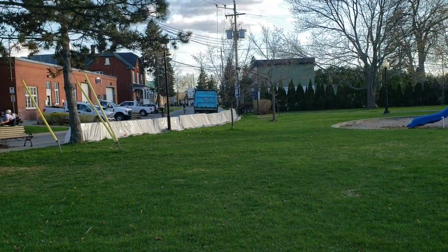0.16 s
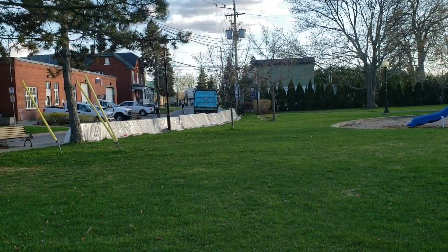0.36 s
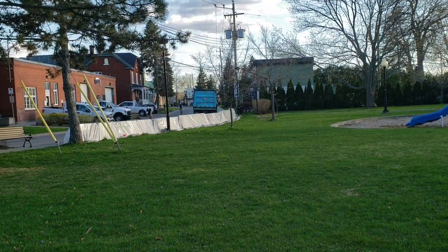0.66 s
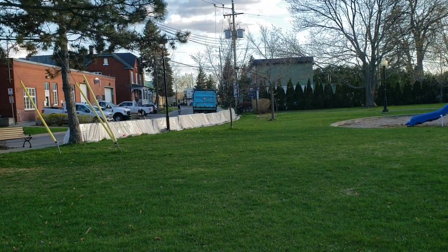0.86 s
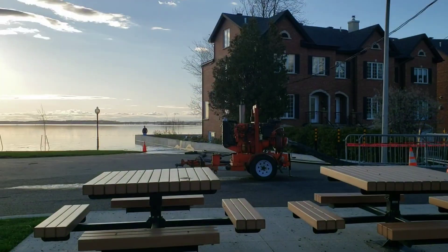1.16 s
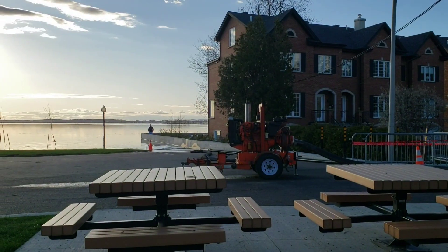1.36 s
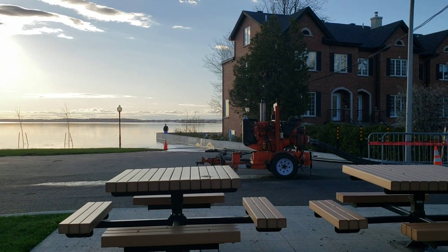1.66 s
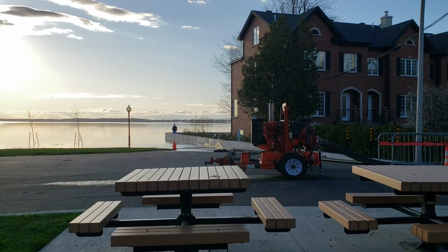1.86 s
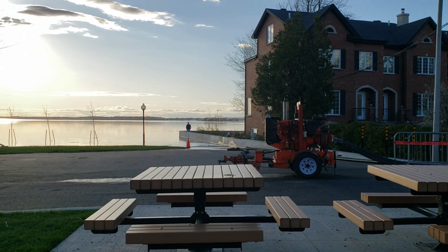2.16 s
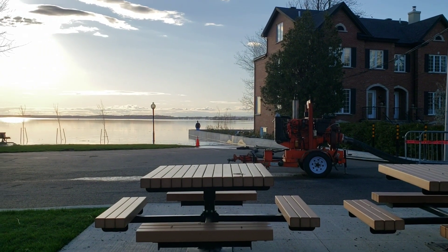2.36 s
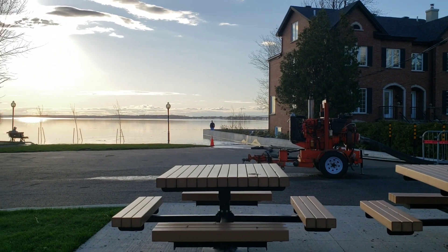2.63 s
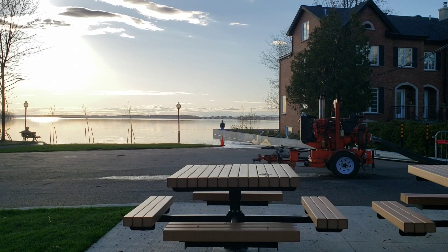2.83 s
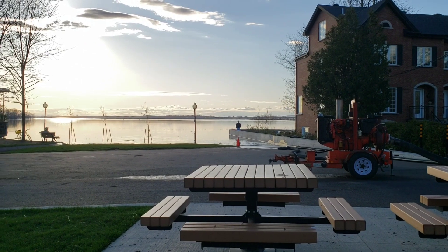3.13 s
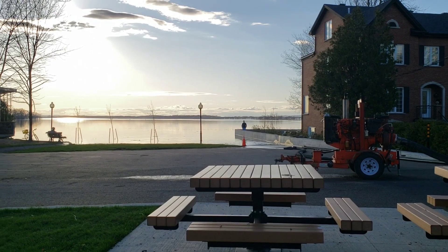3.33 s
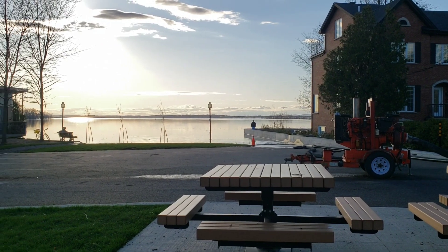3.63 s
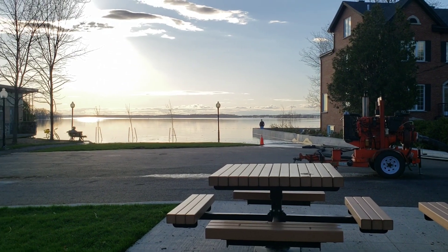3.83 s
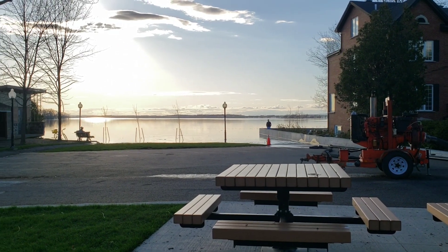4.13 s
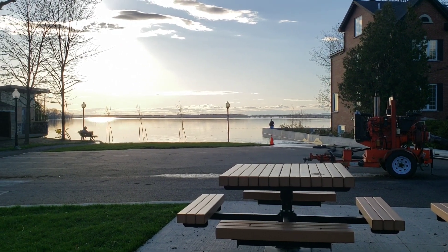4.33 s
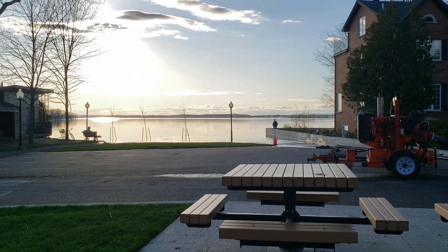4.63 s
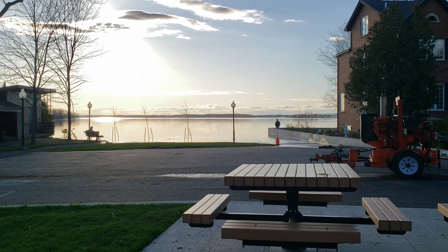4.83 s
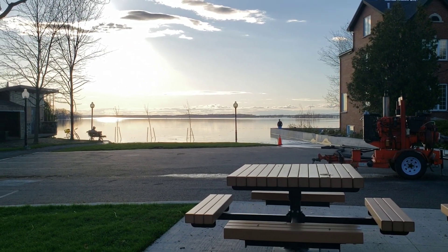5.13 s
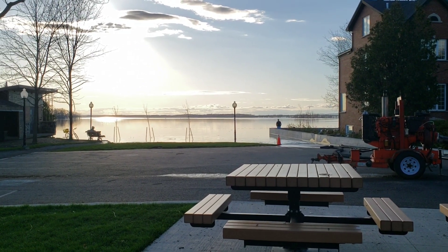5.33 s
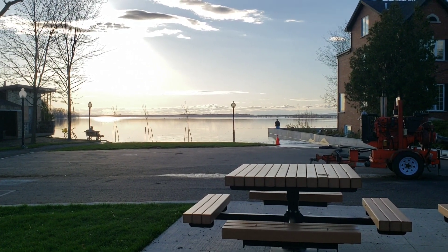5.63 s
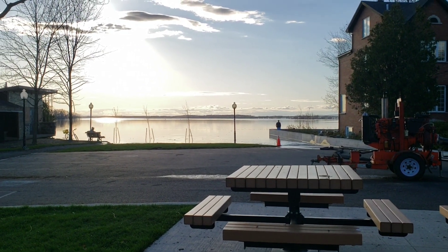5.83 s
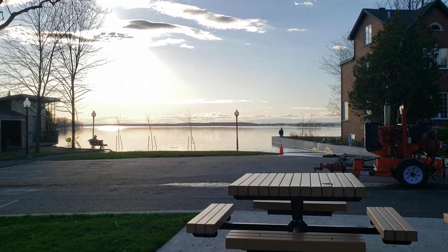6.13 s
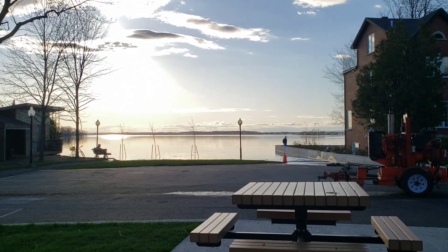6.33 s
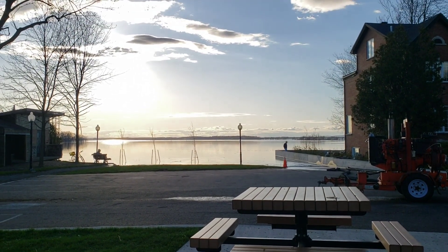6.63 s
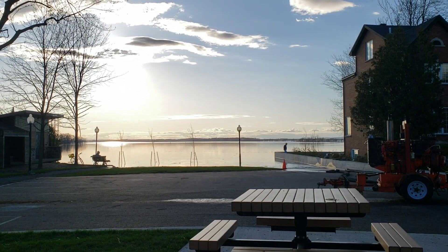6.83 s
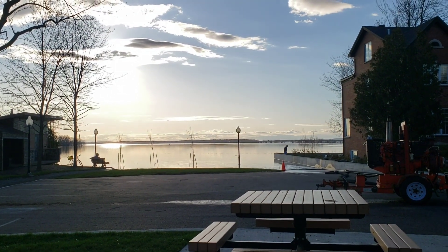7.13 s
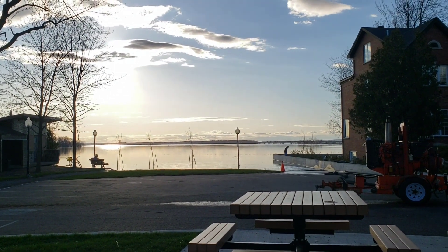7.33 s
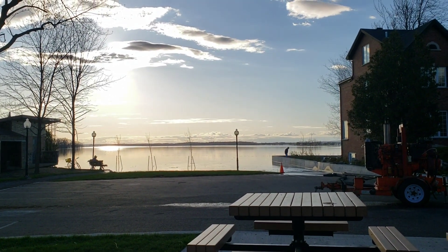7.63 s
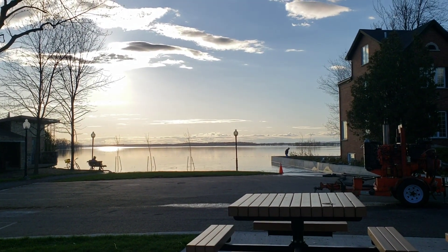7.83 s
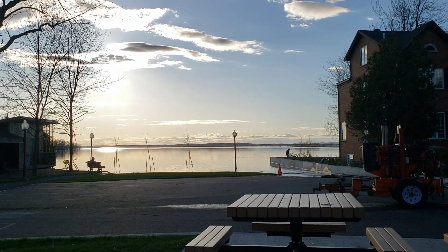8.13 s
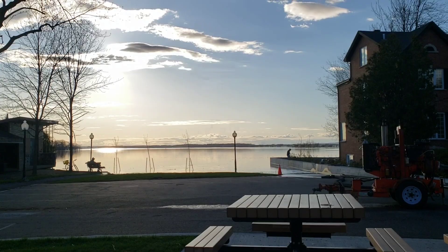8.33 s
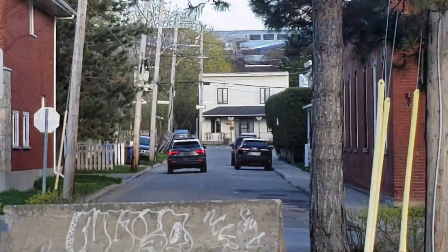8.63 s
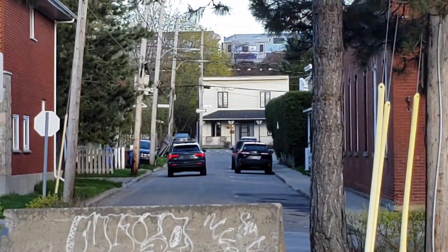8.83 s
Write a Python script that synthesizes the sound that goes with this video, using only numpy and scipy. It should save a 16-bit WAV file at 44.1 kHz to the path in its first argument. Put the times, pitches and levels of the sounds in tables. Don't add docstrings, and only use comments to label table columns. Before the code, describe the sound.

A quiet park opens with dull air noise and the swelling low hum of a distant engine. After about a second it blends into a trailer-mounted diesel pump on a paved lakeshore: rapid uneven throbbing, metallic knock, low exhaust hum and broad hiss from a second machine beside it. It starts subdued, grows much louder around three seconds, then runs steadily. At the end it dissolves into a car idling on a street. Stereo microphone, open air.

```python
import sys
import numpy as np
from scipy import signal
from scipy.fft import rfft, irfft, next_fast_len
from scipy.io import wavfile
from scipy.ndimage import map_coordinates

SR = 44100
rng = np.random.default_rng(int(sys.argv[2]) if len(sys.argv) > 2 else 0)


def decibels_to_gain(level_db):
    exponent = np.asarray(level_db, float) / 20
    return 10 ** exponent


def digitize_waveform(pressure):
    field = np.atleast_2d(pressure).T
    bounded = np.clip(field, -1, 1)
    quanta = np.round(bounded * 32767).astype(np.int16)
    wavfile.write(sys.argv[1], SR, quanta)


N = 396018
SIZE = next_fast_len(N + SR // 4)
TIME, HZ = np.arange(N) / SR, np.maximum(np.arange(SIZE // 2 + 1) * SR / SIZE, 1)

CYCLE_HZ, SIDE_CYCLE_HZ = 7.8006, 11.347
FIRST_FADE_S, SECOND_FADE_S = (0.9, 1.156), (8.35, 8.78)

# [t/s into the cycle, level/dB]
PUMP_FIRINGS = [
    (.003, 3.5),
    (.035, 0),
    (.067, 1),
    (.099, 2.5),
]
# [t/s into the cycle, level/dB]
SIDE_BLOWS = [
    (.004, -3),
    (.049, -0.5),
]


def ramp(start_s, end_s):
    return np.clip((TIME - start_s) / (end_s - start_s), 0, 1)


def at_hz(points):
    hz, db = np.array(points)[:, :2].T
    return np.interp(np.log(HZ), np.log(hz), db)


def drift(rate):
    r = np.exp(-80 * np.pi * rate / SR)
    slow = signal.lfilter([1], [1, -2 * r, r * r], rng.standard_normal(N // 40 + 2002))[2000:]
    return np.interp(np.arange(N) / 40, np.arange(len(slow)), slow / slow.std())


def late(x, lag_ms):
    return map_coordinates(x, [np.arange(N) - lag_ms * SR / 1000], order=3, mode="nearest")


def port_noise(left_db, right_db, alike, lag_ms):
    common, *own = rng.standard_normal((3, N)) * np.sqrt(SR / 2)
    share = np.clip(at_hz(alike), 0, 1)
    shared_part = np.sqrt(share) * rfft([late(common, lag_ms), common], SIZE)
    own_part = np.sqrt(1 - share) * rfft(own, SIZE)
    return (shared_part + own_part) * decibels_to_gain(np.array([left_db, right_db]))


def ridges(rows, depth):
    lift_db = sum(db * np.exp(-2.8 * ((HZ - hz) / width) ** 2) for hz, width, db in rows)
    return depth * (lift_db - 1.2 * (HZ > 4000) * (HZ < 12500))


def tones(rows, base_hz, wobble_db, wander, locked=1e9, pulse_s=0, turn=0, clock=TIME):
    out = 0
    sway = [drift(4.3) for _ in range(min(7, len(rows) + 1))]
    swell = np.sqrt(2) * decibels_to_gain(wobble_db * np.array(sway))
    for i, (multiple, db) in enumerate(rows):
        start = turn if multiple % locked == 0 else rng.random()
        phase = 2 * np.pi * (multiple * base_hz * (clock - pulse_s) + start) + wander * sway[i % len(sway)]
        out = out + decibels_to_gain(db) * swell[(3 * i + 1) % len(sway)] * np.cos(phase)
    return out


def park_shot():
    # [f/Hz, level/dB per Hz]
    park_left = [(25, -70), (181, -75), (298, -78.5), (556, -90.5), (1980, -86), (2260, -91.5), (4220, -95),
                 (5010, -93), (5700, -95), (7390, -97), (8590, -110.3), (9360, -104.4), (13800, -115.6),
                 (15700, -114.7)]
    park_right = [(25, -79), (129, -70.5), (292, -80.5), (522, -92), (1260, -88), (3710, -97),
                  (4600, -102.3), (5460, -97), (5950, -87.5), (7390, -99.8), (8050, -94.5), (10400, -107.7),
                  (12700, -101.9), (15700, -109.7)]
    # [f/Hz, common share 0-1]
    park_alike = [(250, .9), (700, .3), (1300, .85), (2200, .65), (3000, .6), (3500, .3), (4000, .55),
                  (4600, .3), (6000, .6), (10000, .75), (12000, .4), (15000, .35)]
    # [f/Hz, width/Hz, level/dB]
    park_ridges = [(1310, 110, -6), (1980, 120, 3), (3700, 250, 4), (4930, 150, 6), (6460, 120, 4),
                   (6990, 80, 5), (8050, 250, 5)]
    # [f/Hz, level/dB rms]
    far_tones = [(62.4, -51.5), (93.6, -55), (163.8, -69), (248.5, -56)]
    # [t/s, half width/s, level/dB]
    rumble_swells = [
        (.22, .09, 2.5),
        (.62, .07, 6),
        (.83, 0.12, 7.5),
    ]

    lift_db = ridges(park_ridges, depth=0.95)
    air = port_noise(at_hz(park_left) + lift_db, at_hz(park_right) + lift_db, park_alike, lag_ms=0.45)
    air = irfft(air, SIZE)[:, :N] * decibels_to_gain(.4 * drift(5))

    swell_db = -4 + sum(db * np.exp(-((TIME - s) / width) ** 2) for s, width, db in rumble_swells)
    hum = decibels_to_gain(swell_db) * tones(far_tones[:-1], base_hz=0.98, wobble_db=-1.0, wander=0.26)
    start_s, end_s, edge_s = 0.21, .72, .05
    on = ramp(start_s - edge_s, start_s) - ramp(end_s, end_s + edge_s)
    hum = hum + on * tones(far_tones[-1:], base_hz=1, wobble_db=.8, wander=0.2)
    return (1 - ramp(*FIRST_FADE_S)) * (air + hum)


def street_shot():
    # [f/Hz, level/dB per Hz]
    street_left = [(25, -38), (126, -47), (511, -74), (803, -68.5), (996, -76), (1240, -70), (2800, -78),
                   (3790, -73), (4700, -85), (6780, -75.5), (8230, -84.5), (10900, -92.5), (14700, -83),
                   (15700, -95)]
    street_right = [(25, -48), (129, -49), (500, -76), (752, -71), (996, -76.5), (2360, -75.5), (2860, -86),
                    (4400, -72), (7550, -100), (8400, -97), (9990, -93), (12100, -90), (13200, -99),
                    (15700, -99)]
    # [f/Hz, common share 0-1]
    street_alike = [(250, 1), (900, 0.84), (1600, 0.54), (2500, 0.29), (15000, 0.32)]
    # [multiple of the cycle, level/dB rms]
    idle_tones = [(4, -53), (5, -30.5), (6, -43), (7, -41), (8, -43), (9, -44), (10, -41), (12, -52),
                  (16, -62)]

    boom_db = -15 / (1 + (HZ / 170) ** 4) - 14 / (1 + (HZ / 55) ** 4)
    left_db, right_db = at_hz(street_left[:-1]) + boom_db, at_hz(street_right[:-1]) + boom_db
    air = port_noise(left_db, right_db, street_alike, lag_ms=-0.11)
    air = irfft(air, SIZE)[:, :N] * decibels_to_gain(0.71 * drift(7.9))
    note = tones(idle_tones, base_hz=15.25, wobble_db=1.3, wander=.5, locked=1, pulse_s=.0328, turn=-.04)
    return ramp(*SECOND_FADE_S) * decibels_to_gain(1.1) * (air + note)


def sooner():
    return 1.35 / 343 * ramp(2.8, 3.8)


def microphone_turn():
    start_s, end_s = 2.3, 3.6
    creep = .07 * np.maximum(TIME - end_s, 0)
    return np.clip(.03 + .7 * ramp(start_s, end_s) + creep, 0, 1)


def port_lag_ms(turned):
    return 0.081 + .12 * turned


def blows(firings, cycle_hz, spread_db, jitter_s):
    starts = np.arange(int(N / SR * cycle_hz) - 1)[:, None] / cycle_hz
    into, db = np.transpose(firings)
    at = starts + into + jitter_s * rng.standard_normal((len(starts), len(into)))
    at = at - np.interp(at, TIME, sooner())
    clicks = np.full(N, 1e-18)
    clicks[np.clip(at * SR, 0, N - 1).astype(int)] = decibels_to_gain(db + spread_db * rng.standard_normal(at.shape))
    return clicks


def puffs(firings, cycle_hz, depth, decay_s):
    r = np.exp(-1 / (decay_s * SR))
    decays = signal.lfilter([1], [1, -r], blows(firings, cycle_hz, spread_db=1, jitter_s=0.00027))
    gate = 1 + depth * signal.lfilter([.02], [1, -.98], decays)
    return gate / np.sqrt(np.mean(gate ** 2))


def in_bands(spectra, patchy_db, gates=()):
    out, together = 0, drift(1.1)
    for hz in 62.5 * 2. ** np.arange(9):
        octaves = np.clip(np.log2(np.clip(HZ, 62.5, 16000) / hz), -1, 1)
        gain = decibels_to_gain(patchy_db * (0.22 * together + drift(24)))
        for low, high, gate in gates:
            if low <= hz <= high:
                gain = gain * gate
        out = out + gain * irfft(spectra * np.cos(np.pi / 2 * octaves) ** 2, SIZE)[:, :N]
    return out


def scatter(count, level_db, longest_ms):
    paths = np.zeros((2, SIZE))
    for port in paths:
        delays = rng.integers(30, int(longest_ms * SR / 1000), count)
        port[delays] = decibels_to_gain(level_db) * rng.choice([-1, 1], count)
    bright = HZ ** 2 / (HZ ** 2 + 2500 ** 2)
    return (1 + bright * rfft(paths)) / np.sqrt(1 + bright ** 2 * count * decibels_to_gain(2 * level_db))


def tangle():
    knot_hz = 90
    knots = rng.standard_normal(int(SR / 2 / knot_hz) + 2)
    wander = map_coordinates(knots, [HZ / knot_hz], order=3)
    phase_rad = 1.3 * wander / (1 + (2700 / HZ) ** 8)
    return np.exp(1j * phase_rad * np.array([[1], [0]]))


def echoes():
    # [t/ms, left level/dB, right level/dB]
    reflections = [
        (3.8, -11, -9),
        (13., -7, -7),
    ]
    ms, *db = np.transpose(reflections)
    gain = decibels_to_gain(np.array(db))
    delays_s = ms[:, None] * np.array([[[1.03]], [[.97]]]) / 1000
    reflected = (gain[..., None] * np.exp(-2j * np.pi * HZ * delays_s)).sum(axis=1)
    comb = 1 - reflected * HZ / (HZ + 600)
    return comb / np.sqrt(1 + (gain ** 2).sum(axis=1, keepdims=True))


def machine_roar(lag_ms):
    # [f/Hz, level/dB per Hz]
    roar_low = [(20, -84), (62, -60), (109, -62.5), (139, -64.5), (181, -63), (256, -63), (294, -64.5),
                (318, -74.5), (330, -78), (405, -63.5), (450, -81), (498, -83.5), (572, -75.5),
                (620, -71.3)]
    # [f/Hz, level/dB per Hz]
    roar_left = [(500, -77.0), (689, -69), (878, -67.5), (1050, -76), (1150, -67.5), (1270, -70),
                 (1720, -66), (2050, -69)]
    roar_right = [(500, -77.2), (854, -67.5), (1050, -75), (1310, -73), (1430, -62), (1550, -75),
                  (1740, -72), (1800, -77), (2010, -66)]
    # [f/Hz, level/dB per Hz]
    hiss_left = [(2300, -72), (2850, -73), (3400, -67.5), (4700, -70.5), (6200, -69.5), (7800, -71),
                 (8600, -76), (9400, -77.5), (10000, -75.5), (11200, -72.3), (12200, -74), (13200, -77.7),
                 (14000, -73), (15700, -72)]
    hiss_right = [(2300, -73), (3500, -76.5), (4000, -74.5), (4700, -69), (5700, -66), (6300, -70),
                  (7300, -76), (7800, -69), (9400, -73.5), (10300, -77), (12200, -68), (13200, -72.5),
                  (14300, -73), (15200, -69), (15700, -71)]
    # [f/Hz, width/Hz, level/dB]
    ridges_left = [(4392, 106, 4), (4823, 252, 2.5), (5340, 199, 6.5), (5813, 162, 2.5), (6395, 220, 5.5),
                   (6761, 149, 4), (7881, 74, 4), (8031, 94, 5), (8204, 82, 4), (8914, 169, 3.5),
                   (10120, 159, 4.5), (10658, 114, 3.5), (11089, 425, 4), (11800, 183, 4.5)]
    ridges_right = [(4242, 225, 4.5), (4521, 80, 4.5), (5103, 90, 4.5), (5361, 128, 4), (5620, 92, 5),
                    (5813, 175, 4), (6416, 156, 5), (7708, 100, 5), (8699, 301, 3), (9173, 164, 5),
                    (9453, 94, 4), (10034, 349, 3.5), (11714, 101, 5), (12187, 375, 3)]
    # [f/Hz, common share 0-1]
    pump_alike = [(60, .85), (150, .96), (300, .9), (500, .78), (900, .93), (1080, .6), (1250, .9),
                  (1800, .96), (2300, .6), (3500, .5), (5400, .82), (7300, .62), (9000, .74), (15000, .68)]

    left_db = at_hz(roar_low[:-1] + roar_left[1:] + hiss_left) + ridges(ridges_left, depth=1.1)
    right_db = at_hz(roar_low[:-1] + roar_right[1:] + hiss_right) + ridges(ridges_right, depth=1.1)
    throb = 1 + 0.14 * np.cos(4 * np.pi * SIDE_CYCLE_HZ * (TIME + sooner() - .032))
    pump_puffs = puffs(PUMP_FIRINGS, CYCLE_HZ, depth=0.76, decay_s=0.027)
    side_puffs = puffs(SIDE_BLOWS, SIDE_CYCLE_HZ, depth=0.28, decay_s=0.0018)
    gates = [(1500, 2500, pump_puffs), (400, 1200, side_puffs), (7000, 17000, throb)]
    clutter = scatter(count=14, level_db=-17, longest_ms=14)
    spectra = port_noise(left_db, right_db, pump_alike, lag_ms) * clutter * tangle()
    return in_bands(spectra, 0.44, gates)


def knocks(modes, firings, cycle_hz, spread_s):
    out = 0
    for hz, db, t60 in modes:
        r, w = decibels_to_gain(-60 / (t60 * SR)), 2 * np.pi * hz / SR
        clicks = blows(firings, cycle_hz, spread_db=1.6, jitter_s=.0001)
        clicks = np.roll(clicks, int(spread_s * SR * rng.random()))
        out = out + decibels_to_gain(db) * signal.lfilter([0, np.sin(w)], [1, -2 * r * np.cos(w), r * r], clicks)
    return out


def combustion_knock(lag_ms):
    # [f/Hz, level/dB, t60/s]
    pump_block = [(1435, -33.5, .06), (1530, -39, .05), (1624, -35, .08), (1693, -37, .07),
                  (1750, -34.5, .05), (2010, -41, .04), (2330, -42, .02)]
    # [f/Hz, level/dB, t60/s]
    side_block = [(613, -40.5, .1), (692, -41, .09), (783, -39.5, .12), (851, -39, .09), (1178, -43, .08)]
    knock = knocks(pump_block, PUMP_FIRINGS, CYCLE_HZ, spread_s=.003)
    knock = knock + knocks(side_block, SIDE_BLOWS, SIDE_CYCLE_HZ, spread_s=.0003)
    ports = [late(knock, lag_ms) * decibels_to_gain(0.5), knock * decibels_to_gain(-2.0)]
    return irfft(rfft(ports, SIZE) * echoes(), SIZE)[:, :N]


def before_turn(after):
    # [f/Hz, level/dB]
    before_left = [(400, -1), (2500, -1.5), (4000, -2), (6200, 0), (7200, 4.5), (8600, -1.5), (9500, 2.5),
                   (10200, 0), (12200, -2), (13500, 0), (15400, -2)]
    before_right = [(400, -1), (2000, 0), (2900, -3.5), (4000, 1.5), (5400, -3), (6200, -5.5), (7400, 2.5),
                    (9400, -3), (11200, 1), (14000, 0), (15400, -2)]
    moved = scatter(count=8, level_db=-17, longest_ms=8)
    colour = decibels_to_gain(np.array([at_hz(before_left), at_hz(before_right)]))
    return irfft(rfft(after, SIZE) * moved * colour, SIZE)[:, :N]


def exhaust_hum():
    # [multiple of the cycle, level/dB rms]
    exhaust_tones = [(4, -62.6), (8, -35.9), (12, -48.4), (16, -47.1), (17, -54.4), (18, -57.4),
                     (19, -50.6), (20, -53.1), (21, -46.3), (24, -54.6), (26, -57.5), (27, -58.2),
                     (28, -58.5), (32, -49.2), (33, -56.2), (37, -59.0), (38, -56.7), (43, -67.0),
                     (47, -58.5), (48, -61.0), (51, -61.3), (52, -56.3)]
    # [multiple of the
    # cycle, level/dB rms]
    side_tones = [(8, -48.5), (12.05, -46), (20, -51.6)]
    clock = TIME + sooner()
    hum = tones(exhaust_tones, CYCLE_HZ, 1.2, .12, locked=4, pulse_s=-.0108, turn=-.3, clock=clock)
    return hum + tones(side_tones, SIDE_CYCLE_HZ, wobble_db=1.5, wander=.25, clock=clock)


def pump_shot():
    turned = microphone_turn()
    lag_ms = port_lag_ms(turned)
    after = machine_roar(lag_ms) + combustion_knock(lag_ms)
    before = before_turn(after)
    sag = decibels_to_gain(-1.4 * ramp(8, 8.5))
    noise = sag * (before + turned * (after - before))
    hum = exhaust_hum() * decibels_to_gain(-1.5 + 1.3 * turned)
    hum = hum * decibels_to_gain(np.array([[-.2], [.2]]))
    fade = ramp(*FIRST_FADE_S) ** 1.24 - ramp(*SECOND_FADE_S) ** 1.16
    level_db = 0.5 + 8.5 * (ramp(2.51, 3.47) - 1)
    return fade * decibels_to_gain(level_db) * (noise + hum)


def scene():
    return park_shot() + street_shot() + pump_shot()


def band_limit(x):
    return signal.sosfilt(signal.butter(12, 16650, fs=SR, output="sos"), x)


def record(dry):
    response = (HZ < 15740) / np.sqrt(1 + (22 / HZ) ** 4)
    mix = irfft(rfft(dry, SIZE) * response, SIZE)[:, :N]
    return band_limit(mix)


dry = scene()
out = record(dry)
digitize_waveform(out)
```